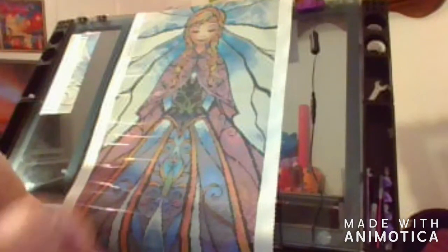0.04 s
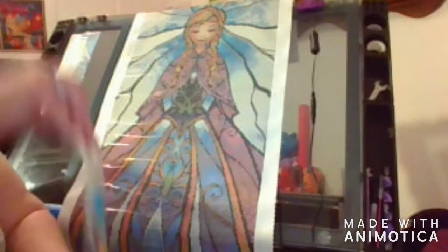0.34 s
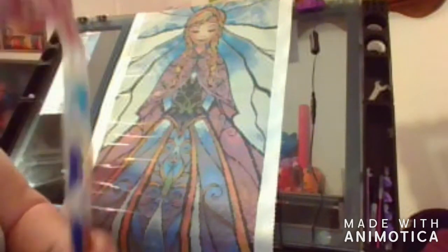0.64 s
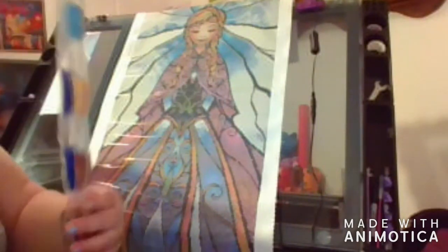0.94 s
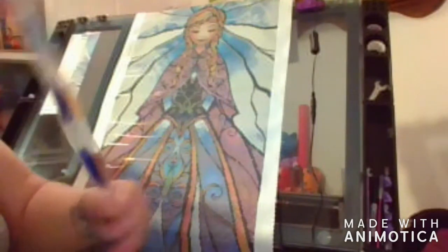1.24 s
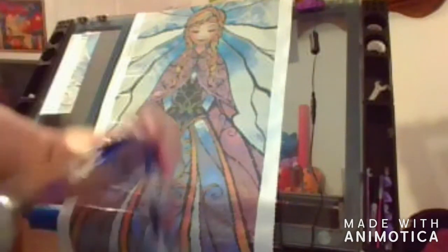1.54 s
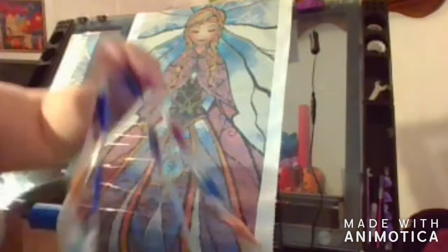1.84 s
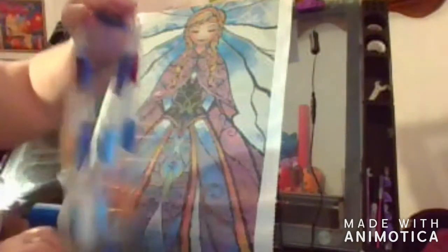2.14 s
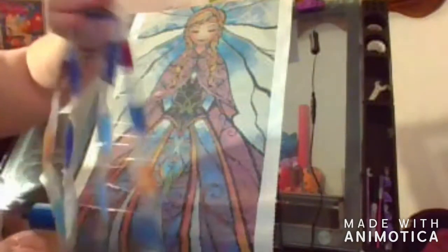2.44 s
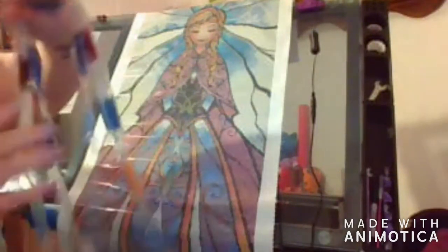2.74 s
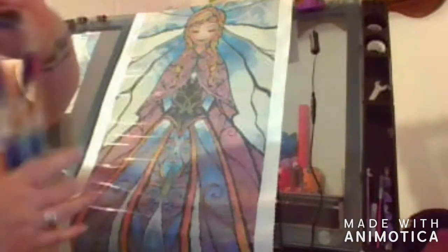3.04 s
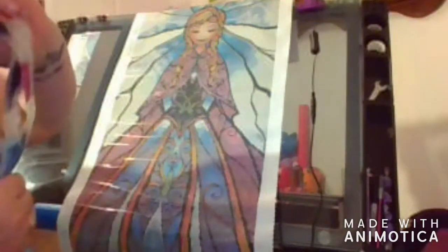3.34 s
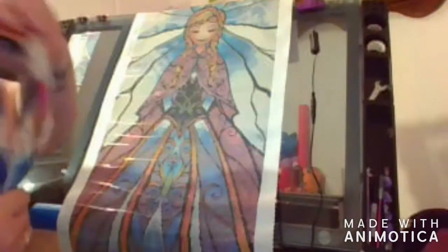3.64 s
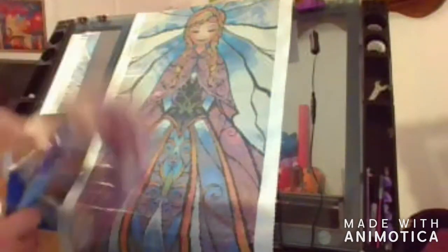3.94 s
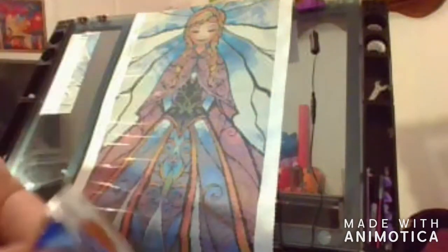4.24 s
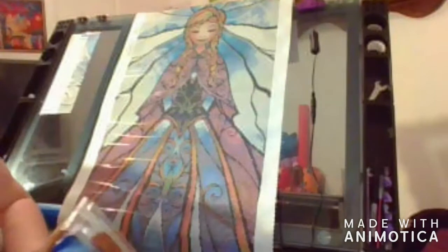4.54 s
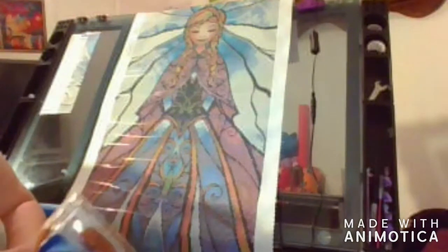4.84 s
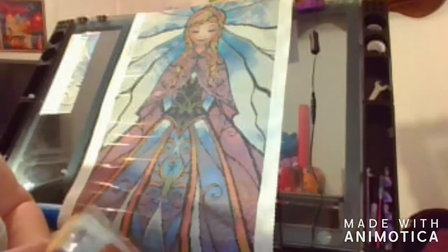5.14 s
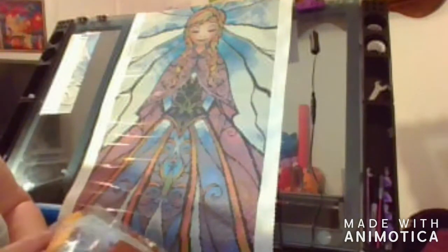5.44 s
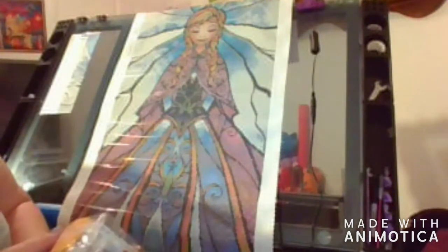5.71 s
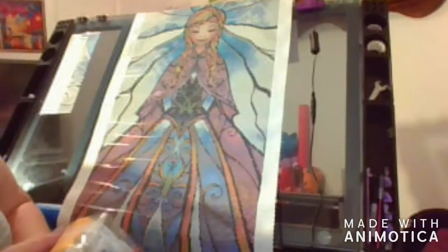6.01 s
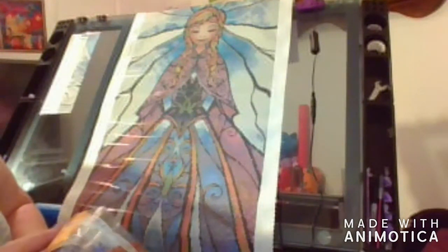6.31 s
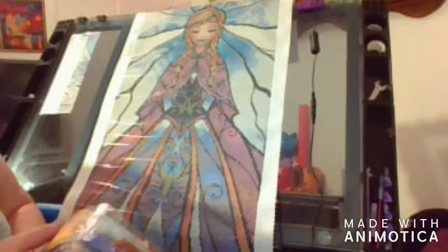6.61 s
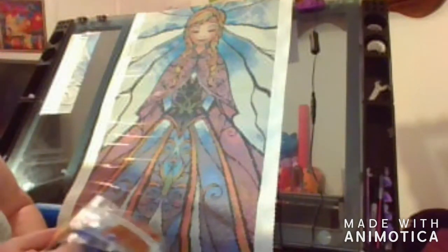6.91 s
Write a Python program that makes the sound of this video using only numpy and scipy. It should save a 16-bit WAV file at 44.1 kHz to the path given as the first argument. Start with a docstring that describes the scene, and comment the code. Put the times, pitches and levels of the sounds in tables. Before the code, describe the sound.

Tiny beads tick and hiss against thin plastic as someone lifts, shakes and folds a strip of little bags at a craft table. The rattling starts sparsely, swells into several uneven bursts, then gives way to sharp crinkles and snaps with short pauses between them. Low rumbles and a few dull knocks come from the table. Everything is close to the microphone, in a small room with a faint electrical hum.

```python
"""Tiny beads rattle in bursts and plastic film snaps, close to the microphone, as a strip of small bags
is lifted, shaken out and folded at a craft table in a small room. The beads tick against the film,
creases flip through, the bags flex, flap and drag, and the hands bump the table.
A faint mains hum lies underneath. The microphone has a narrow band; three times the level dips briefly."""
import sys
import numpy as np
from scipy import signal
from scipy.fft import rfft, irfft, next_fast_len
from scipy.io import wavfile
from scipy.ndimage import uniform_filter1d, map_coordinates

SR = 44100
rng = np.random.default_rng(int(sys.argv[2]) if len(sys.argv) > 2 else 0)


def inscribe(sig):
    """Save sig as 16-bit PCM at rate SR to the path in sys.argv[1].

    A 1-D sig is mono; a 2-D sig holds one channel per row.
    Samples are clipped to [-1, 1] before scaling.
    """
    pcm = np.round(np.clip(np.atleast_2d(sig).T, -1, 1) * 32767)
    wavfile.write(sys.argv[1], SR, pcm.astype(np.int16))


N = 311787

# each lift, shake or fold: (start [s], rise [s], hold [s], bead level [dB], film level [dB])
BAG_MOVES = [(0.0, 0.0082, 0.045, -45, -53), (0.153, 0.00297, 0.01227, -43, -61.5),
             (0.742, 0.0706, 0.033, -52, -58), (1.106, 0.016, 0.01782, -41, -50),
             (1.484, 0.0386, 0.0568, -35, -53.5), (1.625, 0.07426, 0.0833, -29.5, -49.5),
             (1.837, 0.049, 0.0151, -43, -47.5), (2.215, 0.0364, 0.01285, -32, -43.5),
             (2.266, 0.03295, 0.02087, -29.5, -41.5), (2.364, 0.01248, 0.0311, -39, -50),
             (2.578, 0.0121, 0.0502, -37.5, -45.5), (2.653, 0.00724, 0.0073, -32, -45),
             (2.763, 0.021, 0.024, -29.5, -39.5), (2.818, 0.019, 0.074, -40, -40.5),
             (2.992, 0.031, 0.02284, -39.5, -46.5), (3.25, 0.06, 0.0414, -46, -62),
             (3.35, 0.012, 0.00715, -37, -44), (3.717, 0.00879, 0.01332, -44, -55),
             (3.803, 0.01091, 0.03376, -45, -47.5), (3.848, 0.0269, 0.1307, -35, -41),
             (3.965, 0.08, 0.208, -28, -42.5), (4.331, 0.02554, 0.01693, -40, -48),
             (4.656, 0.0184, 0.0259, -52, -50), (4.829, 0.014, 0.0076, -36, -42),
             (4.887, 0.00907, 0.00866, -49.5, -48.5), (5.179, 0.0261, 0.01182, -45, -47),
             (5.341, 0.03823, 0.0708, -47, -50), (5.458, 0.005, 0.044, -35.5, -47),
             (5.583, 0.01413, 0.1585, -39.5, -46.5), (5.754, 0.02726, 0.0557, -36, -42.5),
             (5.958, 0.01644, 0.015, -49, -51.5), (6.575, 0.0573, 0.0372, -42.5, -52.5),
             (6.677, 0.0109, 0.0585, -34, -40), (6.764, 0.03345, 0.0434, -38.5, -42),
             (6.96, 0.03294, 0.0285, -46, -52.5)]


def amp(db):
    """Decibels to gain."""
    return 10 ** (np.asarray(db) / 20)


def unit(x):
    """Scale to rms 1."""
    return x / np.sqrt(np.mean(x ** 2) + 1e-20)


def along(points, hz):
    """Read (frequency, value) points on a log frequency axis."""
    freqs, values = np.transpose(points)
    return np.interp(np.log(hz + 1), np.log(freqs + 1), values)


def curve(rows):
    """Turn (time [s], value) rows into one value per sample."""
    return np.interp(np.arange(N) / SR, *np.transpose(rows))


def add(track, start_s, sound):
    """Mix a sound into the track."""
    part = track[max(round(start_s * SR), 0):][:len(sound)]
    part += sound[:len(part)]


def coloured(x, points, size=2048):
    """Minimum-phase filter through (frequency [Hz], gain [dB]) points."""
    cepstrum = irfft(np.log(amp(along(points, np.fft.rfftfreq(size, 1 / SR)))))
    cepstrum[1:size // 2] *= 2
    cepstrum[size // 2 + 1:] = 0
    return signal.fftconvolve(x, irfft(np.exp(rfft(cepstrum))))[:N]


def patchy(x, depth_db, width_hz, span_s, size=1024):
    """Let the colour wander in random swells about width_hz wide and span_s long."""
    frames = dict(nperseg=size, noverlap=size * 3 // 4)
    spectra = signal.stft(x, **frames)[2]
    swells = rng.standard_normal(spectra.shape)
    for axis, sigma in enumerate([width_hz * size / SR / 2, span_s * SR / (size // 4) / 2]):
        bell = signal.windows.gaussian(size // 16 + 1, sigma)
        swells = signal.fftconvolve(swells, np.expand_dims(bell, 1 - axis), "same")
    gain = amp(depth_db * np.clip(unit(swells), -2, 2))
    return signal.istft(spectra * gain, **frames)[1][:N]


def short_power(x, size):
    """Running mean square over size samples."""
    return np.abs(uniform_filter1d(x ** 2, size)) + 1e-20


def steady(x, size):
    """Hold the short-term rms near 1 while keeping the single grains."""
    return x / np.sqrt(short_power(x, size) + np.mean(x ** 2) / 1000)


def grains(per_s, spread_db, life_s, size=96):
    """Tiny contacts at random times, each a dying noise burst of its own strength."""
    starts = np.flatnonzero(rng.random(N) < per_s / SR)
    age = np.arange(size)
    bursts = rng.standard_normal((len(starts), size)) * np.exp(-age / (life_s * SR))
    strengths = amp(spread_db * np.minimum(rng.standard_normal((len(starts), 1)), 2))
    return np.bincount((starts[:, None] + age).ravel(), (strengths * bursts).ravel(), N + size)[:N]


def thuds(rows, t60, attack_s, width, ring_share):
    """Damped blows: a short ring at each row's pitch, blurred by noise around it."""
    out, t = np.zeros(N), np.arange(SR // 4) / SR
    envelope = amp(-60 * t / t60) * (1 - np.exp(-t / attack_s))
    for start, db, hz in rows:
        band = signal.butter(2, [hz / (1 + width), hz * (1 + width)], "band", fs=SR)
        blur = unit(signal.lfilter(*band, rng.standard_normal(len(t))))
        blow = ring_share * np.sin(2 * np.pi * hz * t) + (1 - ring_share) * blur
        add(out, start, amp(db) * signal.lfilter(*band, envelope * blow))
    return out


def echoes(x, draw_response, size):
    """Reflections, drawn anew every size samples as the bags move and change shape."""
    out, fade = np.zeros(N + size), signal.windows.hann(2 * size, sym=False)
    x = np.pad(x, (size, 2 * size))
    for i in range(0, N + size, size):
        response = draw_response()
        block = x[i:i + 2 * size] * fade
        add(out, i / SR, signal.fftconvolve(block, response / np.linalg.norm(response)))
    return out[size:]


def room_tone():
    """Mains hum and the faint hiss of the room."""
    # mains harmonics: (frequency [Hz], level [dB])
    harmonics = [(120, -82), (240, -80.5), (360, -85.5)]
    # spectrum of the hiss: (frequency [Hz], gain [dB])
    hiss_colour = [(30, -38), (150, 1), (500, -29), (2000, -14), (7000, -6.5)]
    t = np.arange(N) / SR
    hum = sum(amp(db) * np.sqrt(2) * np.sin(2 * np.pi * hz * t) for hz, db in harmonics)
    hiss = amp(-80) * unit(coloured(rng.standard_normal(N), hiss_colour))
    return hum + hiss


def walls(x):
    """The walls of the small room answer; the low notes linger longest."""
    # reverberation: (frequency [Hz], time to fall 60 dB [s])
    decay_times = [(200, 1), (700, 0.586), (1500, 0.22), (4000, 0.06), (8000, 0.056)]
    def tail():
        hz, t, spectra = signal.stft(rng.standard_normal(SR // 2), SR, nperseg=256)
        decay = amp(-60 * t / along(decay_times, hz)[:, None])
        return signal.istft(spectra * decay, SR, nperseg=256)[1]
    return echoes(x, tail, size=16384)


def scatter(x, wet_db, t60):
    """Close by, table, easel and hands throw back a quick spray of reflections."""
    t = np.arange(SR // 10) / SR
    decay = amp(-60 * t / t60)
    return x + amp(wet_db) * echoes(x, lambda: rng.standard_normal(len(t)) * decay, size=4096)


def craft_table(flex, tug_db=-22):
    """The table rumbles unevenly under the arms, is tugged by each move and takes a few bumps."""
    # arms and hands moving against the table: (time [s], level [dB])
    handling = [(0, -62), (.55, -72), (.85, -66), (1.4, -62.5), (1.8, -52.5), (2.15, -61.5), (2.4, -53),
                (3.15, -51), (3.7, -57), (4.2, -52), (4.55, -64), (4.95, -56.5), (5.35, -60.5), (5.85, -51),
                (6.15, -60.5), (6.45, -72), (6.68, -50), (7.07, -62)]
    # spectrum of the tabletop: (frequency [Hz], gain [dB])
    table_colour = [(25, -41.5), (50, -28.5), (90, -10.5), (125, 9.5), (170, -8), (205, -1.5), (245, 8),
                    (320, -9), (500, -23.5), (1000, -23.5)]
    # soft bumps of the hands: (time [s], level [dB], pitch [Hz])
    bumps = [(1.545, -41, 183), (2.345, -38, 229.4), (2.82, -24.5, 161.7), (3.362, -35.5, 200.3),
             (3.756, -45, 230), (5.965, -37, 242.4), (6.89, -43, 159)]
    rumble = coloured(rng.standard_normal(N), table_colour)
    rumble = patchy(rumble, depth_db=9.5, width_hz=52.9, span_s=.0405)
    push = np.hypot(amp(curve(handling)), amp(tug_db) * flex)
    knocks = thuds(bumps, t60=.135, attack_s=.0011, width=1, ring_share=.67)
    return push * steady(rumble, size=5500) + knocks


def drags(sag_octaves=.45, fade_db=-6, relative_width=.248):
    """A bag drags over a surface: a dull scrape whose pitch and level fall as it slows."""
    # scrapes: (start [s], length [s], level [dB], starting pitch [Hz])
    scrapes = [(2.839, 0.19, -51.5, 1893), (2.836, 0.33, -52, 901), (4.9, 0.2876, -56, 1001),
               (6.51, 0.0965, -60, 1004), (6.824, 0.2, -51.5, 478.6), (6.971, 0.0964, -46.5, 1000)]
    out = np.zeros(N)
    for start, length, db, start_hz in scrapes:
        progress = np.linspace(0, 1, round(length * SR))
        lowpass = signal.butter(2, relative_width * start_hz, fs=SR)
        grit = signal.lfilter(*lowpass, rng.standard_normal(N))[:len(progress)]
        hz = start_hz * 2 ** (-sag_octaves * progress)
        scrape = unit(grit * np.sin(2 * np.pi * np.cumsum(hz) / SR))
        add(out, start, amp(db + fade_db * progress) * signal.windows.tukey(len(progress)) * scrape)
    return out


def flaps():
    """Whole bag faces pop or flap, each a short, noisy thud."""
    # pops of a bag face: (time [s], relative level [dB], pitch [Hz])
    pops = [(1.139, -35, 941), (1.841, -24.5, 1192), (2.382, -27.5, 964.7), (2.662, -29, 1107),
            (2.723, -30, 529.5), (3.366, -21, 1096), (3.408, -30.5, 1452), (4.83, -30.5, 640.6),
            (5.7, -26, 940.4), (5.784, -26.5, 991.6), (6.687, -26, 961.6), (6.775, -28, 939.5)]
    return amp(4.5) * thuds(pops, t60=.01796, attack_s=.00051, width=.4, ring_share=.363)


def effort(levels_db, fall_db_per_s, linger_db=-25, linger_db_per_s=82):
    """Amplitude of the moves: each rises, holds and falls, and the bags stir faintly afterwards."""
    t = np.arange(0, N / SR, .001)
    power = np.zeros(len(t))
    for (start, rise, hold, *_), db in zip(BAG_MOVES, levels_db):
        after = np.maximum(t - start - rise - hold, 0)
        fall = amp(-fall_db_per_s * after) + amp(linger_db - linger_db_per_s * after)
        power += (amp(db) * np.clip((t - start) / rise, 0, 1) * fall) ** 2
    return curve(np.column_stack([t, np.sqrt(power)]))


def jerks(shake, per_s=70, life_s=.002, jolt_db=1, even_flow_db=-17):
    """Gain around 1: creases give way in jerks that jolt beads and film; hard shaking evens it out."""
    kicks = 1.0 * (rng.random(N) < per_s / SR)
    jolts = signal.lfilter([1], [1, -np.exp(-1 / (life_s * SR))], kicks)
    uneven = steady(1 + amp(jolt_db) * np.minimum(jolts, 1), size=2600)
    flow = np.minimum(shake / amp(even_flow_db), 1)
    return flow + (1 - flow) * uneven


def hollow(rustle, length_s=.056, spacing_hz=1120):
    """For a moment the rustle narrows into ringing bands, at the same power."""
    # hollow moments: (centre time [s])
    centres = [0.03, 1.986, 2.305, 5.665, 5.844, 5.985, 6.91]
    t = np.arange(N) / SR
    share = sum(np.clip(2 - 4 * abs(t - centre) / length_s, 0, 1) for centre in centres)
    combed = rustle + np.roll(rustle, round(SR / spacing_hz))
    ringing = patchy(combed, depth_db=8, width_hz=110, span_s=.1)
    ringing *= np.sqrt(short_power(rustle, 700) / short_power(ringing, 700))
    return np.sqrt(1 - share) * rustle + np.sqrt(share) * ringing


def film(flex, folds_per_s=45, fold_octaves=.13):
    """The bending film crackles lower than the beads, finer when bent hard; folding retunes it."""
    # resonances of the film: (frequency [Hz], gain [dB])
    film_colour = [(50, -72.5), (250, -18.5), (400, -9), (650, -6.5), (900, 3.5), (1300, -10.5), (2100, 1),
                   (3500, -27), (8000, -22.5)]
    crackle = grains(per_s=350 + 1800 * flex / flex.max(), spread_db=5.5, life_s=.0006)
    crackle = scatter(coloured(crackle, film_colour), wet_db=-1.5, t60=.04)
    folds = rng.standard_normal(int(N * folds_per_s / SR) + 2)
    octaves = fold_octaves * map_coordinates(folds, [np.arange(N) * folds_per_s / SR])
    retuned = map_coordinates(crackle, [np.cumsum(2 ** octaves) % (N - 1)])
    retuned = patchy(retuned, depth_db=5, width_hz=129.7, span_s=.02365)
    return flex * steady(retuned, size=1300)


def crease_flip(t, hz):
    """One crease flips through in about two cycles."""
    swell = t * hz / .62
    return swell ** 2 * np.exp(2 * (1 - swell)) * np.sin(2 * np.pi * (hz * t + rng.random()))


def snaps(shiver_db=-14.5, shiver_t60=.01694, cascade_db=-12.5, cascade_s=.016):
    """A crease flips, the film around it shivers, and two smaller creases give way just after."""
    # creases snapping through: (time [s], relative level [dB], pitch [Hz])
    creases = [(0.0208, -27, 4790), (0.1583, -36, 5520), (0.3486, -36, 5500), (.8094, -30, 5780),
               (0.842, -25, 2830), (.987, -31, 3710), (1.018, -32, 3837), (1.11, -29, 4450),
               (1.133, -16.5, 3817), (1.1395, -20, 3803), (1.2767, -31.5, 4605), (1.3255, -31.5, 4840),
               (1.4488, -30.5, 3400), (1.4746, -25, 3250), (1.4914, -23.5, 4040), (1.5229, -9, 6190),
               (1.5254, -21, 6255), (1.539, -19.5, 5994), (1.7728, -22.5, 5490), (1.8907, -24, 5200),
               (2.239, -11, 5920), (2.346, -16, 5535), (2.3605, -21.5, 3965), (2.3849, -26, 3990),
               (2.4121, -29.5, 5720), (2.5825, -21.5, 4840), (2.5921, -16.5, 5280), (2.6631, -13.5, 3980),
               (2.7907, -19.5, 5920), (3.2232, -38.5, 5390), (3.2775, -28, 4400), (3.356, -18, 4504),
               (3.3683, -11.5, 4340), (3.6643, -26.5, 5200), (3.721, -27, 2800), (3.7287, -30.5, 4000),
               (3.817, -21, 4100), (3.828, -21.5, 3902), (3.8531, -8.5, 4970), (3.886, -9, 3866),
               (3.9132, -15, 3600), (3.9445, -12, 5290), (3.9723, -15, 5600), (3.9883, -16, 4780),
               (4.019, -8.5, 6180), (4.108, -10, 5460), (4.232, -7.5, 4700), (4.326, -34, 1761),
               (4.8298, -12, 5000), (4.843, -15.5, 3165), (5.0147, -36, 3368), (5.207, -24, 3634),
               (5.236, -22.5, 6200), (5.3822, -29.5, 4020), (5.4603, -12.5, 5186), (5.4608, -10.5, 5190),
               (5.5168, -9, 5470), (5.534, -10, 5850), (5.581, -19.5, 5580), (5.5971, -28, 6040),
               (5.7019, -9.5, 4745), (5.7675, -18, 4870), (5.7863, -11, 4590), (5.8281, -11, 5200),
               (5.8788, -26, 4500), (5.9112, -31, 4040), (6.081, -38.5, 3520), (6.171, -39, 5670),
               (6.2023, -39, 4210), (6.5864, -23, 6100), (6.619, -12, 5450), (6.681, -12, 3615),
               (6.7152, -9, 5860), (6.7489, -9, 4596), (6.816, -10, 4420), (6.822, -16.5, 4200),
               (6.8615, -10, 5716), (6.9371, -25.5, 2996), (7.0369, -33.5, 4030)]
    out, t = np.zeros(N), np.arange(SR // 25) / SR
    for start, db, hz in creases:
        gain = amp(db - 2)
        band = signal.butter(2, [hz * .631, hz * 1.389], "band", fs=SR)
        shiver = unit(signal.lfilter(*band, rng.standard_normal(len(t))))
        shiver *= amp(shiver_db - 60 * t / shiver_t60)
        softness = amp(np.interp(db, [-32, -18], [5, 0]))  # weak creases flip less and shiver more
        add(out, start, gain * (crease_flip(t, hz) / softness + softness * shiver))
        for delay, colour in rng.random((2, 2)):
            follower = crease_flip(t, hz * 2 ** (.5 - colour))
            add(out, start + cascade_s * delay, gain * amp(cascade_db) * follower)
    return out


def beads(shake, jolts):
    """Beads slide and tick against the film; harder shaking adds contacts until they merge into hiss."""
    # spectrum of the ticks: (frequency [Hz], gain [dB])
    bead_colour = [(60, -65.5), (400, -33.5), (900, -8.5), (1400, -9), (2100, -5.5), (3400, 5), (4200, 4.5),
                   (5200, 6.5), (6800, 7.5), (9000, -1.5)]
    slide = grains(per_s=400 + 12000 * shake / shake.max(), spread_db=3.5, life_s=.000237)
    slide = scatter(coloured(slide, bead_colour), wet_db=-1, t60=.074)
    slide = steady(patchy(slide, depth_db=3.5, width_hz=160, span_s=.02), size=1800)
    crinkles = grains(per_s=65, spread_db=3.5, life_s=.0003)
    crinkles = scatter(coloured(crinkles, bead_colour), wet_db=-3, t60=.055)
    crinkles = steady(patchy(crinkles, depth_db=5, width_hz=1200, span_s=.03), size=7000)
    # single crinkles stand out most when the bags are nearly still
    share = np.interp(20 * np.log10(shake), [-58, -45, -30], [.6, .2, .04])
    return shake * (np.sqrt(1 - share) * jolts * slide + np.sqrt(share) * crinkles)


def level_dips(depth_db=-38.5, edge_s=.0159):
    """Gain for the whole scene: the level dips briefly."""
    # dips: (start [s], length [s])
    dips = [(0.406, 0.0618), (0.731, 0.0143), (6.489, 0.0193)]
    t = np.arange(N) / SR
    inside = sum(np.clip((length / 2 - abs(t - start - length / 2)) / edge_s + .5, 0, 1)
                 for start, length in dips)
    return amp(depth_db * inside)


def scene():
    """The bags close to the microphone, the table under them and the small room around."""
    # rustle of the bags while they are only held: (time [s], level [dB])
    held_levels = [(0, -53.5), (.3, -65.5), (.5, -73), (.72, -75), (1.04, -59), (1.26, -66), (1.34, -55),
                   (2.1, -63), (2.55, -58), (3.6, -62), (4.4, -60), (4.58, -67), (4.72, -58), (5.1, -62),
                   (6.05, -61.5), (6.28, -75), (6.42, -76), (6.6, -57), (7.07, -54.5)]
    held = amp(curve(held_levels))
    *_, beads_db, film_db = np.transpose(BAG_MOVES)
    shake = np.hypot(effort(beads_db, fall_db_per_s=290), held)
    flex = np.hypot(effort(film_db, fall_db_per_s=244), amp(-8.5) * held)
    jolts = jerks(shake)
    hits = scatter(flaps() + snaps(), wet_db=-5, t60=.1)
    rustle = hollow(beads(shake, jolts) + jolts * film(flex)) + drags()
    reverb = walls(amp(-13) * hits + amp(-21) * rustle)
    mix = hits + rustle + reverb + craft_table(flex) + room_tone()
    return (mix * level_dips())[None]


def record(dry):
    """The close mono microphone thins the deep bass and top treble and keeps nothing above its band."""
    # microphone response: (frequency [Hz], gain [dB])
    response = [(25, -16), (60, -9), (100, -1), (7100, 3), (7600, -3), (7950, -26.5), (8400, -10),
                (9000, -23.5)]
    top_hz = 9150
    size = next_fast_len(N + SR // 2)
    in_band = np.fft.rfftfreq(size, 1 / SR) < top_hz
    spectrum = rfft(coloured(dry[0], response), size)
    return irfft(spectrum * in_band, size)[None, :N]


dry = scene()
out = record(dry)
inscribe(out)
```